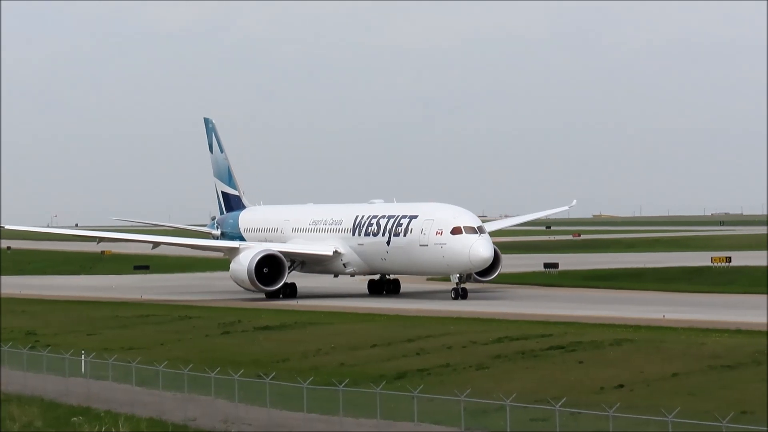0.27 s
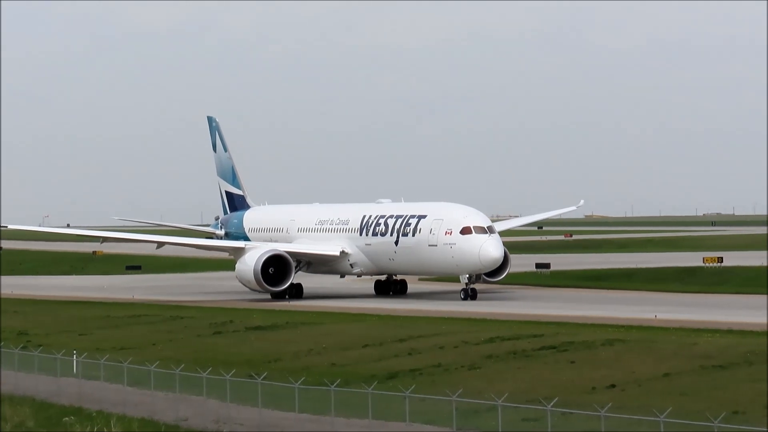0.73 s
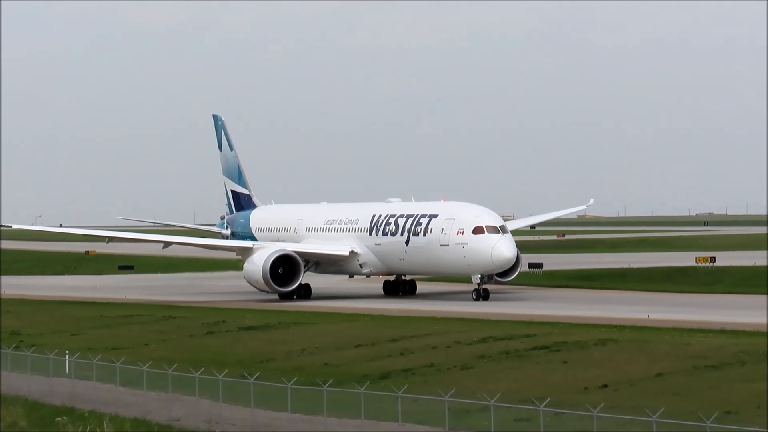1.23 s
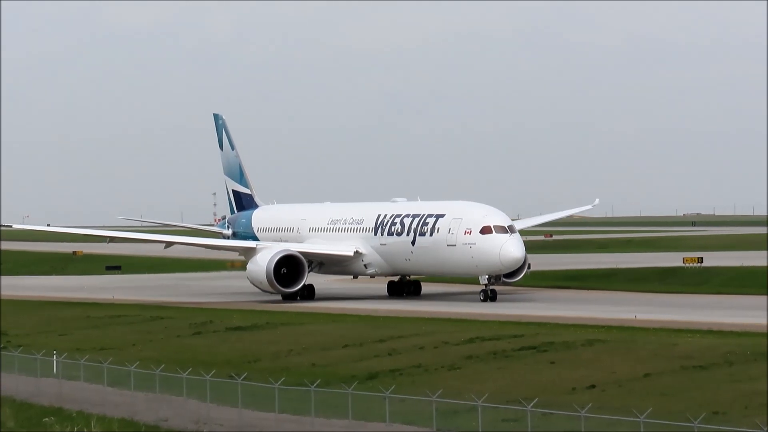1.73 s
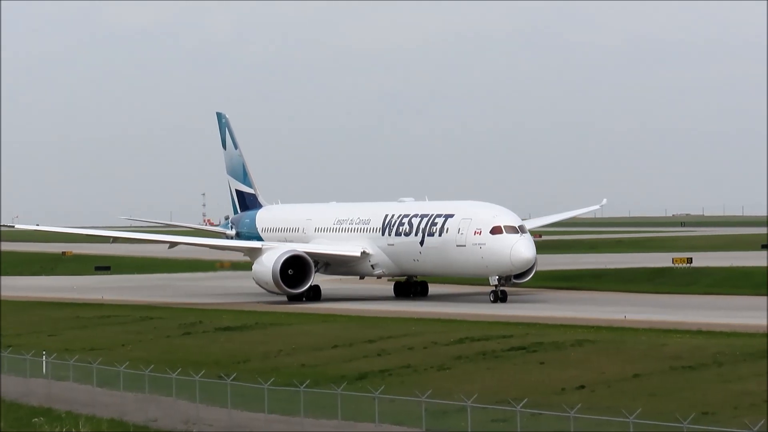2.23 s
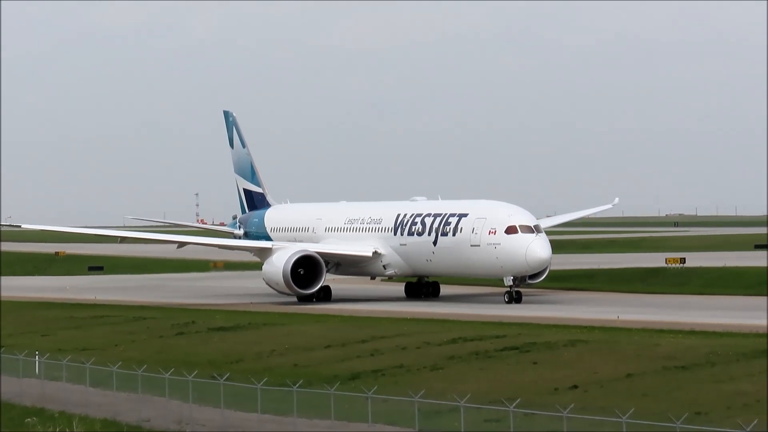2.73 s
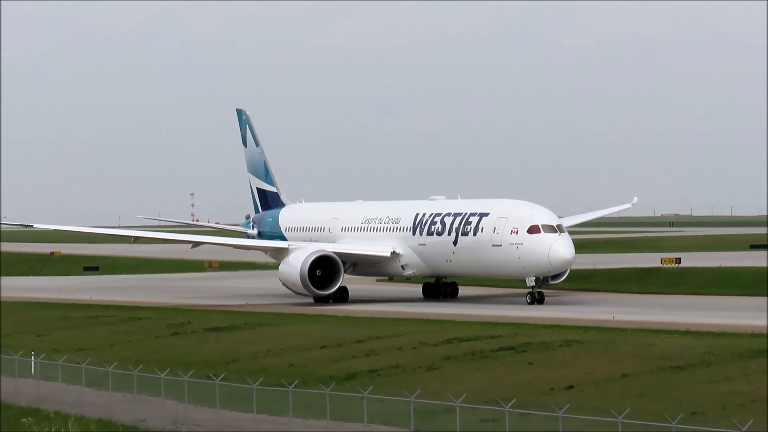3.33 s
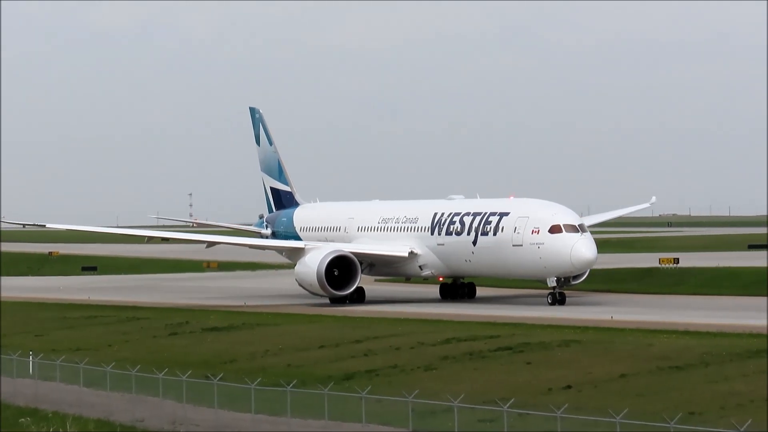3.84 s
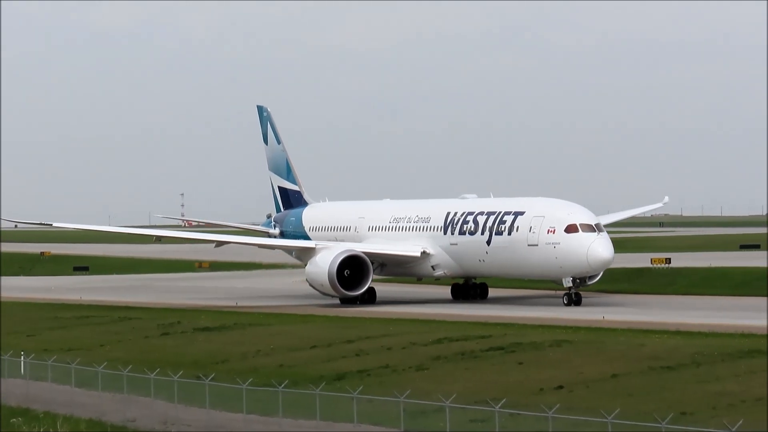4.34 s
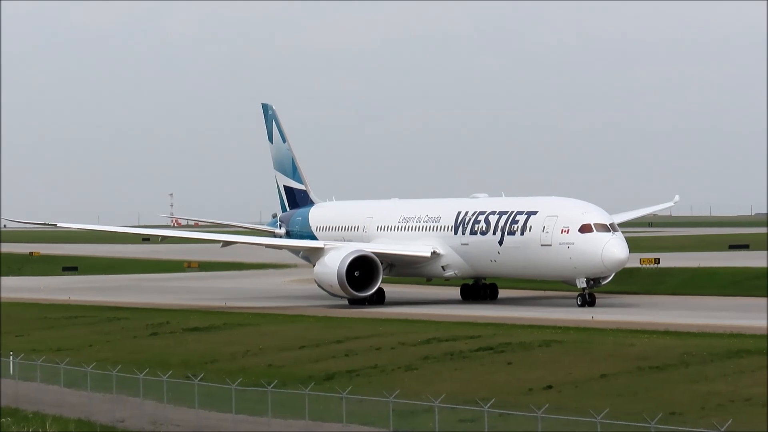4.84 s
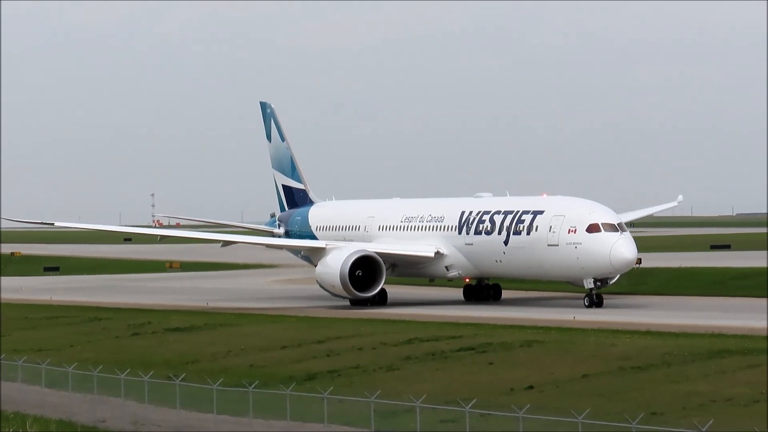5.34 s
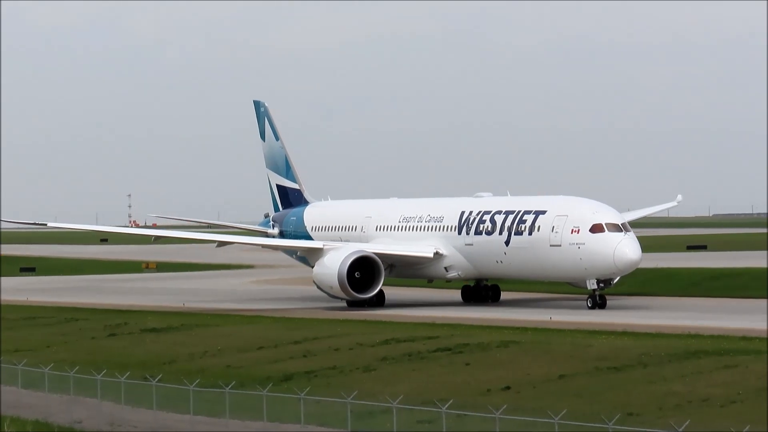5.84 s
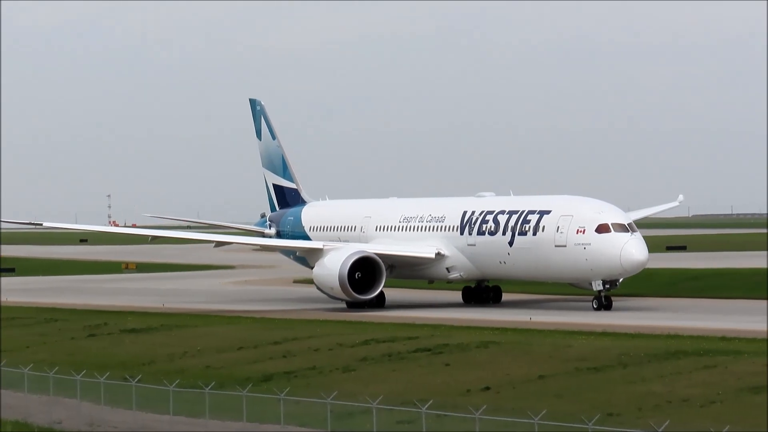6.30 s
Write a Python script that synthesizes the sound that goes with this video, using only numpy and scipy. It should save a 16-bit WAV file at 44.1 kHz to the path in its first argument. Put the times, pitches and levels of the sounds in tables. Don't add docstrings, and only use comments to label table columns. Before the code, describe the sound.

Outdoors at an airfield, a small stereo camera microphone hears a large twin-engined jet taxi past at middle distance. From 0 s a broad airy roar and hiss runs continuously, its bands shimmering and swelling unevenly, fullest around 1.6 to 2 s. A thin, very high compressor whine pierces it, strongest in the first second and again near 1.7 s, above a hollow midrange fan ring. Faint traffic wash at left is clearest at 0.1 to 0.4 s, then fades. Light wind makes low soft bumps, with a short blunt shudder at about 0.85 s. A low propeller drone, slight at first, dips, then swells from 3 s, strongest at 4 to 5 s, sliding gradually down in pitch and drifting from left toward right. The jet roar and whine duck beneath it. By 6.5 s the deep hum continues, slightly softer, over the hissy jet.

```python
import sys
import numpy as np
from scipy import signal
from scipy.fft import rfft, irfft, next_fast_len
from scipy.io import wavfile
from scipy.ndimage import uniform_filter1d

SR = 44100
rng = np.random.default_rng(int(sys.argv[2]) if len(sys.argv) > 2 else 0)


def wrap_up_sound(samples):
    columns = np.atleast_2d(samples).T
    tamed = np.clip(columns, -1, 1)
    steps = np.round(tamed * 32767).astype(np.int16)
    wavfile.write(sys.argv[1], SR, steps)


def to_linear_factor(level_db):
    exponent = np.asarray(level_db, float) / 20
    return 10 ** exponent


N = 289737

SIZE = next_fast_len(N + 4096)
HZ = np.maximum(np.arange(SIZE // 2 + 1) * SR / SIZE, 1)


def roar(patchy_db, flicker_db):
    # time_s, level_db
    carried = [(0.0, -33), (0.11, -27.5), (0.82, -25.5), (0.93, -30), (1.59, -27.5), (1.65, -23),
               (1.79, -23), (2.05, -33), (2.29, -29.5), (2.96, -29.5), (3.29, -33.5), (3.51, -32.5),
               (4.37, -39.5), (4.79, -34.5), (5.27, -35.5), (5.47, -35.5), (5.71, -40), (6.57, -34)]
    range_hz = [600, 1700, 2900, 5600]
    follows_air = [.2, 0.37, 1.02, 0.73]
    follows_gain = [0.37, 0.63, .05, 0.21]
    turn = [-0.53, -.6, -0.085, 0.36]
    # pitch_hz, level_db (per Hz)
    colour = [(120, -9), (200, -16.5), (300, -17.5), (500, 1), (850, -1), (1300, -5.5), (2000, -3),
              (2400, -2), (2900, -6), (3600, -7), (4400, -8), (5600, -14.5), (6800, -23), (7700, -29.5)]
    # pitch_hz, width_hz, level_db
    resonances = [(2400, 400, 1), (3384, 48, 3.5)]

    controls = np.array([in_time(carried)[0], gain_db(), np.arange(N) / SR])
    levels = np.transpose([follows_air, follows_gain, turn]) @ controls
    levels -= levels.mean(axis=1, keepdims=True)
    white = rfft(rng.standard_normal((3, SIZE)))
    out = 0
    for octave in np.arange(6.5, 13.4, 1 / 3):
        band = np.cos(np.pi / 2 * np.clip(3 * (np.log2(HZ) - octave), -1, 1)) ** 2
        weights = [np.interp(octave, np.log2(range_hz), one) for one in np.eye(4)]
        patches_db = patchy_db * drift(0.53) + flicker_db * drift(10.5)
        gain = to_linear_factor(weights @ levels + pockets_db(octave) + patches_db)
        out = out + gain * irfft(white * band, SIZE)[:, :N]
    fall_db = -135 * np.maximum(HZ / 7700 - 1, 0)
    casing_db = sum(level_db / (1 + (2 * (HZ - hz) / width) ** 2) for hz, width, level_db in resonances)
    return to_linear_factor(-24.5) * rms_one(filtered(out, to_linear_factor(at_hz(colour) + casing_db + fall_db)))


def pockets_db(octave):
    # middle_s, half_length_s, lift_db, centre_hz
    pockets = [(.25, .1, 4, 1700), (1.154, 0.11, -2.5, 2780), (1.375, 0.051, 4, 4470),
               (1.765, 0.062, 2.5, 4900), (2.338, 0.069, 1, 2364), (2.3, 0.13, -3, 4210),
               (3, 0.28, -9.5, 1270), (3.3, .2, 4, 5500), (5.42, .12, 6, 3500), (5.35, 0.18, -2.5, 4300),
               (6.1, .15, 2, 2400), (6.1, 0.14, 3, 260), (2.3, .15, 3.5, 1000), (2.1, .1, 7, 1200),
               (0.67, 0.085, -3, 880), (0.72, 0.11, -8.5, 3800), (0.38, .1, -0.5, 2800), (4, .1, -3.5, 350),
               (5.3, .1, 2.5, 270), (4.7, 0.33, -1.5, 7000), (4.1, .1, 4.5, 1000), (.85, .1, 0.5, 2000),
               (.07, .07, -3.5, 400), (3.8, .15, 0.5, 1100), (2.6, 0.085, 0, 3500),
               (.04, 0.054, -2.5, 1300)]
    width_octaves = 0.35
    t = np.arange(0, N + 256, 256) / SR
    middle, half, lift_db, hz = np.transpose(pockets)[:, :, None]
    in_moment = ((t - middle) / half) ** 2
    in_pitch = ((octave - np.log2(hz)) / width_octaves) ** 2
    lift = lift_db * np.exp(-in_moment - in_pitch)
    return np.interp(np.arange(N) / SR, t, lift.sum(axis=0))


def whine():
    # start_s, length_s, level_db, side (-1 lower, 0 blade, 1 upper)
    focus = [(.05, 0.24, -32, 0), (.43, 0.11, -28.5, 0), (.58, 0.28, -30.5, 0), (1.3, 0.47, -38, 0),
             (1.68, 0.19, -31.5, 0), (2.14, 0.098, -43, 0), (2.33, 0.5, -39, 0), (2.8, 0.34, -36.5, 0),
             (3.349, 0.25, -37, 0), (3.68, 0.15, -37.5, 0), (4.0, .2, -49, 0), (4.68, 0.58, -44.5, 0),
             (5.8, 0.61, -48, 0), (6.3, 0.37, -46, 0), (.1, 0.47, -42, 1), (.78, 0.063, -34.5, 1),
             (1.55, 0.25, -33, 1), (3.05, 0.49, -45, 1), (3.85, .17, -44, 1), (4.701, 0.26, -45, 1),
             (5.35, .2, -39.5, 1), (5.55, 0.16, -42.5, 1), (5.83, 0.12, -46.5, 1), (6.1, 0.57, -51, 1),
             (.4, 0.11, -40, -1), (1.25, .6, -42, -1), (2.72, .2, -54, -1), (4.03, 0.092, -44, -1),
             (4.7, 0.15, -47, -1), (6.25, 0.28, -46, -1)]
    unfocused_db = [-54.5, -46, -48]
    blade_hz, shaft_hz = 3791, 169.3
    out = 0
    for side, resting_db in zip((-1, 0, 1), unfocused_db):
        rows = [row for row in focus if round(row[-1]) == side]
        level_db = swells(rows, edge_s=0.05, between_db=resting_db + gain_db())
        out = out + tone(blade_hz + side * shaft_hz, level_db, wobble_hz=1.2, flutter_db=1.1)
    return out


def fan():
    # start_s, length_s, level_db
    rushes = [(.05, 0.15, -34), (.5, .3, -31.5), (1.0, 0.82, -33), (1.75, .7, -30), (2.5, .3, -34),
              (4.5, 0.84, -38.5)]
    # start_s, length_s, level_db
    blade_moments = [(.15, .15, -34.5), (.4, 1.6, -38), (1.85, .9, -41.5), (3.25, 0.068, -40)]
    duct_hz, duct_width_hz = 1045, 375
    ringing = 1 / (1 + 1j * (HZ ** 2 - duct_hz ** 2) / (HZ * duct_width_hz)) ** 2
    air = rms_one(filtered(rng.standard_normal(N), ringing))
    rush_db = swells(rushes, edge_s=0.26, between_db=-32.5 + 1.7 * gain_db())
    blade_db = swells(blade_moments, edge_s=0.1, between_db=-46.5 + gain_db())
    return to_linear_factor(rush_db) * air + tone(863, blade_db, wobble_hz=6.9, flutter_db=4.0)


def propeller():
    # time_s, pitch_hz
    blade_rate = [(0, 125.1), (.6, 123.8), (1.6, 122.4), (3.0, 114.6), (4.3, 106.7), (5.3, 99.75),
                  (6.57, 95.1)]
    # time_s, level_db
    drone = [(0, -33.5), (.35, -38), (1.2, -50.5), (3.0, -35), (3.45, -24.5), (3.7, -19), (4.25, -17.5),
             (4.47, -20), (4.62, -15.5), (4.85, -20), (5.0, -18.5), (5.17, -21), (5.4, -20), (5.55, -23.5),
             (5.8, -21.5), (5.98, -24.5), (6.15, -23), (6.57, -24)]
    # start_s, length_s, level_db, harmonic
    overtones = [(-.2, 0.31, -34, 2), (0.398, 0.28, -45.5, 2), (2.2, .55, -43, 2), (3.052, .75, -40, 2),
                 (3.744, 0.62, -34.5, 2), (4.297, 0.49, -37, 2), (5.6, 1, -53, 2), (-.1, 0.27, -33.5, 3),
                 (0.383, 0.17, -28, 3), (0.704, 0.13, -36, 3), (1.055, 0.74, -40, 3), (2.106, 0.23, -40, 3),
                 (2.9, 0.38, -39.5, 3), (3.495, 0.87, -38, 3)]
    # time_s, level_db
    wash_level = [(0, -44), (1.1, -50), (2.6, -51), (3.5, -45), (4.4, -48), (6.0, -41.5), (6.57, -38)]
    # pitch_hz, level_db (per Hz)
    wash_colour = [(60, -16.5), (130, -7), (220, -4.5), (330, 3), (600, -2.5), (1200, -20), (2500, -34.5),
                   (7000, -100)]

    rate_hz = uniform_filter1d(in_time(blade_rate)[0], size=SR // 3, mode="nearest")
    phase = 2 * np.pi * np.cumsum(rate_hz) / SR
    harmonics_db = [uniform_filter1d(in_time(drone)[0], size=SR // 15, mode="nearest")]
    for harmonic in (2, 3):
        rows = [row for row in overtones if round(row[-1]) == harmonic]
        harmonics_db.append(swells(rows, edge_s=0.28, between_db=-60))
    flutter_db = np.array([[0.4], [1.2], [2.2]]) * drift(3)
    levels = to_linear_factor(np.array(harmonics_db) + flutter_db)
    blades = np.sqrt(2) * sum(level * np.sin((k + 1) * phase) for k, level in enumerate(levels))
    wash = rms_one(filtered(rng.standard_normal(N), to_linear_factor(at_hz(wash_colour))))
    return blades + to_linear_factor(in_time(wash_level)[0] + 10) * wash


def wind(evened):
    # start_s, length_s, level_db
    gusts = [(.48, 0.19, -38), (.78, 0.095, -23), (.96, 0.055, -34), (1.15, 0.12, -31), (1.32, 0.11, -34.5),
             (1.45, 0.13, -32.5), (1.75, 0.16, -36), (2.02, 0.094, -33), (2.22, 0.06, -32),
             (2.43, 0.16, -34.5), (2.72, 0.091, -31.5), (2.9, 0.11, -30.5), (3.1, .2, -39),
             (3.4, 0.26, -37), (3.74, 0.25, -30.5), (4.08, .05, -36), (4.57, 0.064, -48), (5.0, .3, -46),
             (5.65, 0.22, -48), (6.4, .25, -33)]
    # time_s, level_db
    breeze = [(0, -46), (.3, -39), (.55, -34.5), (3.3, -36), (4.0, -41), (4.3, -47.5), (6.57, -43)]
    # pitch_hz, level_db (per Hz)
    colour = [(14, -2.5), (30, -2), (45, -1), (70, -7.5), (120, -13), (250, -31), (600, -61), (2000, -120)]
    pressure = rng.standard_normal(N) + 0.048 * rng.standard_normal((2, N))
    lumps = filtered(pressure, to_linear_factor(at_hz(colour)))
    lumps = lumps / uniform_filter1d(lumps ** 2, size=4000) ** (evened / 2)
    return to_linear_factor(swells(gusts, edge_s=0.038, between_db=in_time(breeze)[0])) * rms_one(lumps)


def buffet():
    middle_s, half_s, swing_hz = 0.848, 0.062, 31.3
    t = np.arange(N) / SR - middle_s
    return -to_linear_factor(-19) * np.exp(-(t / half_s) ** 4) * np.tanh(3.1 * np.cos(2 * np.pi * swing_hz * t))


def traffic():
    # time_s, level_db
    fading = [(0, -41.5), (.12, -26.5), (.3, -28.5), (.45, -35), (2, -38.5), (2.7, -41.5), (6.57, -55.5)]
    # pitch_hz, level_db (per Hz)
    colour = [(90, -23), (200, -20), (400, 1.5), (1000, 0.5), (1500, 1.5), (2100, -8), (3000, -15),
              (7000, -88)]
    wash = rms_one(filtered(rng.standard_normal(N), to_linear_factor(at_hz(colour))))
    return to_linear_factor(in_time(fading)[0] + 3.2 * drift(4.9)) * wash * to_linear_factor(np.array([[0], [-11]]))


def ports(direct, scattered):
    # pitch_hz, left_right_db, scattered_share
    pair = [(40, -10.5, .05), (115, 10.5, 0.1), (187, 2, 0.59), (258, 5.5, 0.075), (470, -1.5, 0.1),
            (1030, -3, 0.062), (1720, -5, 0.068), (2600, -2, 0.015), (3420, -4.5, 0.019), (4370, 2, 0.021),
            (5350, 5, 0.14), (6900, 4.5, 0.11), (8240, 9, 0.82), (9100, 14.5, 0.27)]
    # pitch_hz, lead_rad
    lead = [(40, -.3), (120, -.5), (175, -.9), (230, -2.4), (500, -2.8), (800, -3.2), (2000, -3.35),
            (2700, -4.1), (3500, -4.65), (4900, -4.9), (6100, -6.3), (7000, -6.7), (8000, -7.8),
            (8800, -9.3)]
    notch_hz, notch_width_hz, notch_db = 4140, 450, -11
    echo, echo_s = -0.053, 0.001056
    half = to_linear_factor(at_hz(pair) / 2) * np.exp(0.5j * at_hz(lead))
    off = 1j * (HZ ** 2 - notch_hz ** 2) / (HZ * notch_width_hz)
    notch = (off + to_linear_factor(notch_db)) / (off + 1)
    housing = notch * (1 + echo * np.exp(-2j * np.pi * HZ * echo_s))
    share = np.clip(at_hz(pair, column=2), 0, 1)
    heard = filtered(direct, np.sqrt(1 - share) * np.array([half * housing, 1 / half]))
    return heard + filtered(scattered, np.sqrt(share) * np.array([half, 1 / half]))


def gain_db():
    # time_s, gain_db
    turned_down = [(0, -0.5), (2.4, 0), (3.5, -1.5), (4.3, -6.5), (4.8, -7), (5.7, -5), (6.57, -2)]
    return in_time(turned_down)[0]


def panned(x, pan_db):
    return np.array([x * to_linear_factor(pan_db / 2), x / to_linear_factor(pan_db / 2)])


def tone(hz, level_db, wobble_hz, flutter_db):
    phase = 2 * np.pi * np.cumsum(hz + wobble_hz * drift(6)) / SR
    return np.sqrt(2) * to_linear_factor(level_db + flutter_db * drift(7.4)) * np.sin(phase)


def swells(rows, edge_s, between_db):
    start, length, level_db = np.transpose(rows)[:3, :, None]
    t = np.arange(0, N + 64, 64) / SR
    held = np.clip(np.minimum(t - start, start + length - t) / edge_s + 0.5, 0, 1)
    power = np.sum((to_linear_factor(level_db) * np.sin(np.pi / 2 * held)) ** 2, axis=0)
    return 10 * np.log10(np.interp(np.arange(N) / SR, t, power) + to_linear_factor(between_db) ** 2)


def drift(rate):
    r = np.exp(-80 * np.pi * rate / SR)
    slow = signal.lfilter([1], [1, -2 * r, r * r], rng.standard_normal(N // 40 + 2002))[2000:]
    return np.interp(np.arange(N) / 40, np.arange(len(slow)), rms_one(slow))


def in_time(rows):
    s, *columns = np.transpose(rows)
    return [np.interp(np.arange(N) / SR, s, c) for c in columns]


def at_hz(points, column=1):
    points = np.array(points)
    return np.interp(np.log(HZ), np.log(points[:, 0]), points[:, column])


def filtered(x, response):
    return irfft(rfft(x, SIZE) * response, SIZE)[..., :N]


def rms_one(x):
    return x / np.sqrt(np.mean(x ** 2) + 1e-20)


def scene():
    # time_s, left_right_db
    bearing = [(0, 2.5), (.7, 3.5), (1.8, 2), (3.2, 2), (6.57, -2)]
    direct, *scattered = roar(patchy_db=0.4, flicker_db=1.01)
    direct = direct + whine()
    direct = direct + panned(fan(), -4)
    direct = direct + panned(propeller(), in_time(bearing)[0])
    return ports(direct, np.array(scattered)) + traffic() + wind(evened=0.18) + buffet()


def top_cut(x):
    return signal.sosfilt(signal.butter(12, 15750, fs=SR, output="sos"), x)


def record(dry):
    shared, *own = rng.standard_normal((3, N))
    level = to_linear_factor(-67.5 + 1.5 * gain_db())
    hiss = level * (0.68 * shared + 0.73 * np.array(own))
    return top_cut(dry + hiss)


dry = scene()
out = record(dry)
wrap_up_sound(out)
```